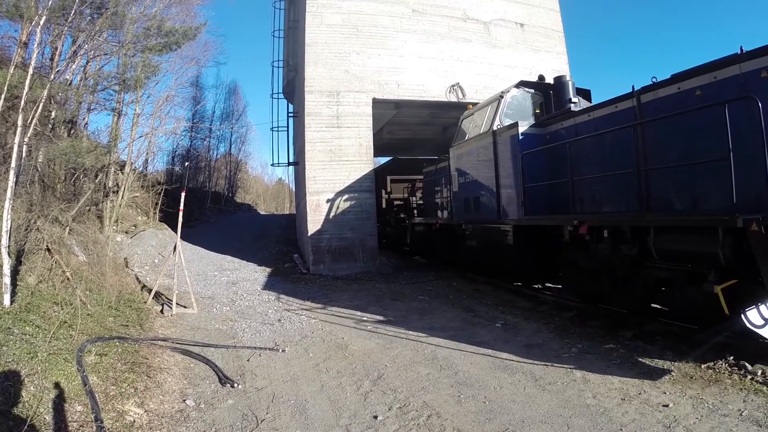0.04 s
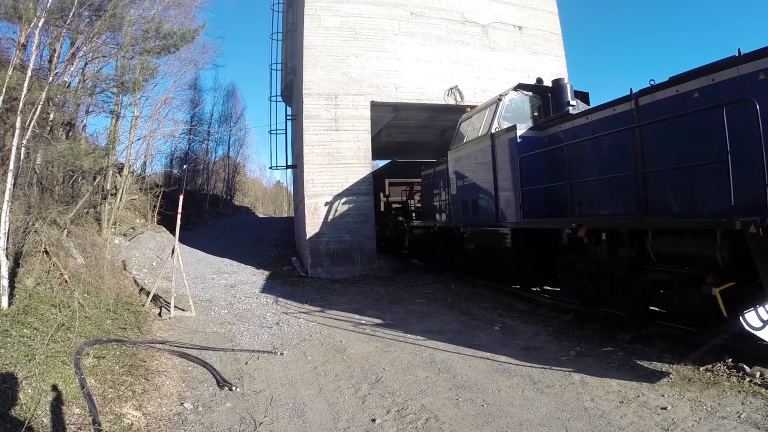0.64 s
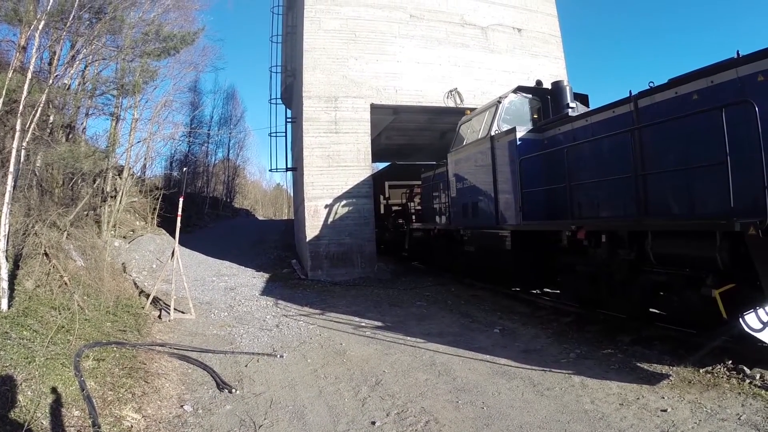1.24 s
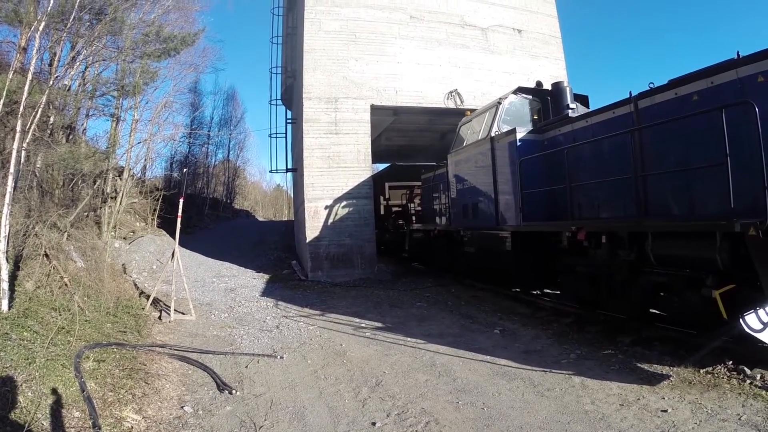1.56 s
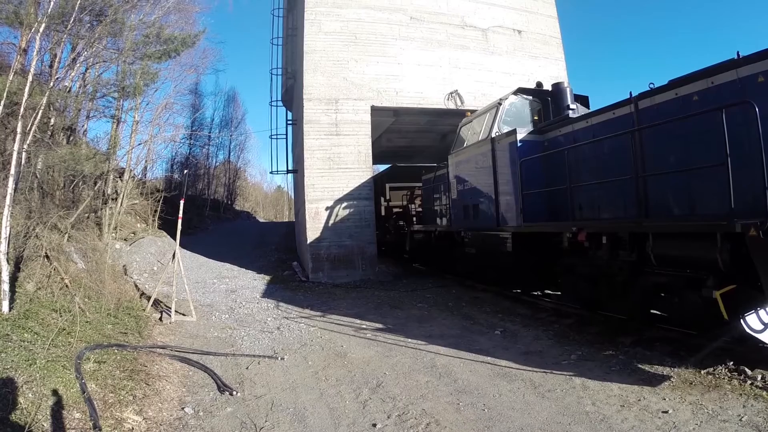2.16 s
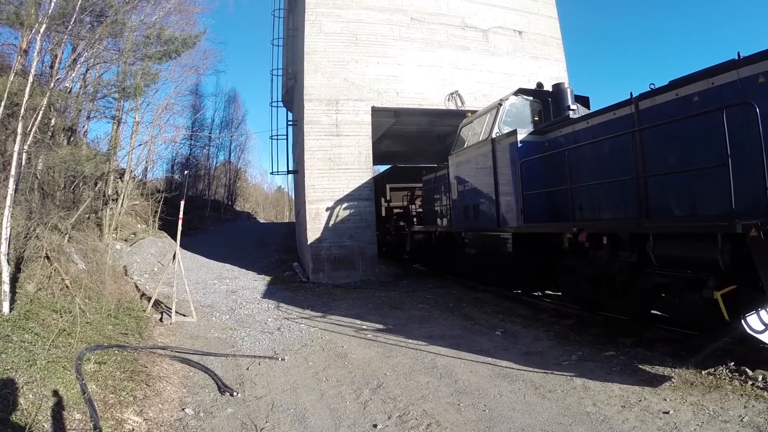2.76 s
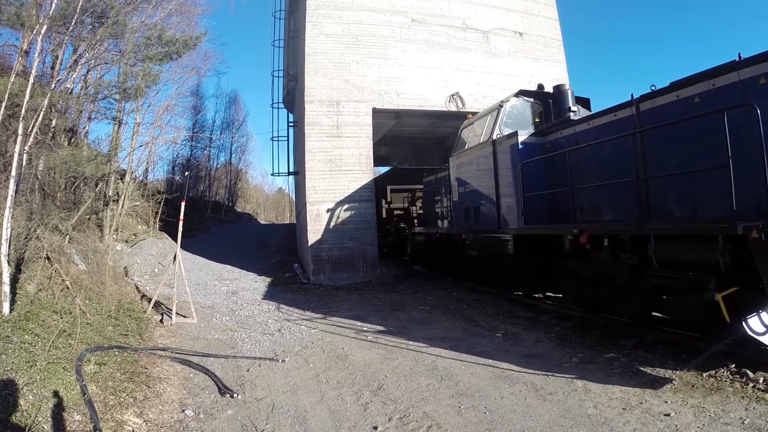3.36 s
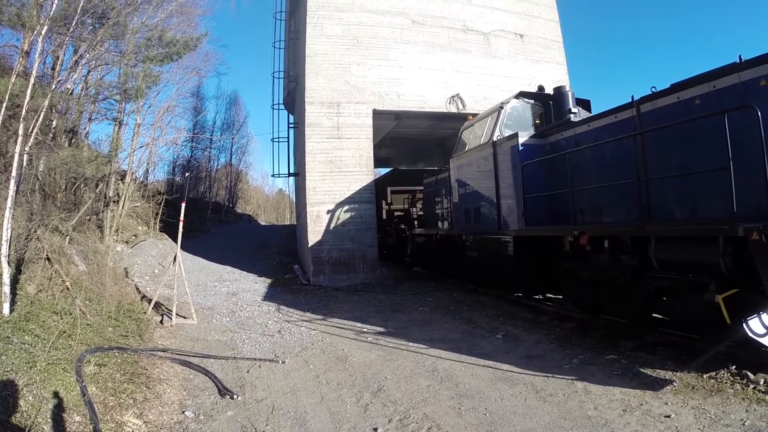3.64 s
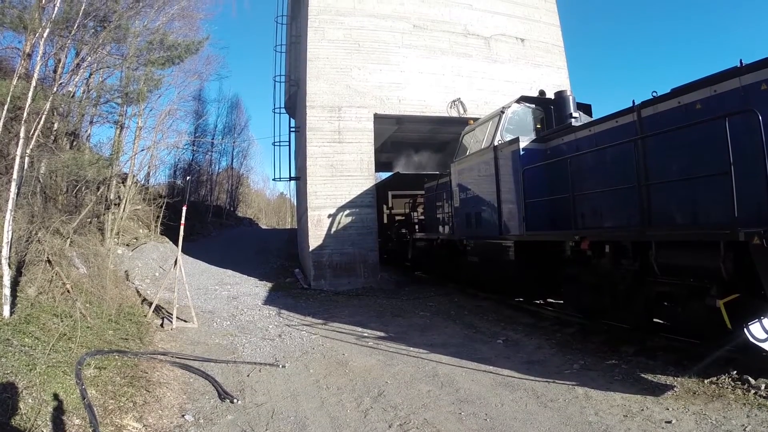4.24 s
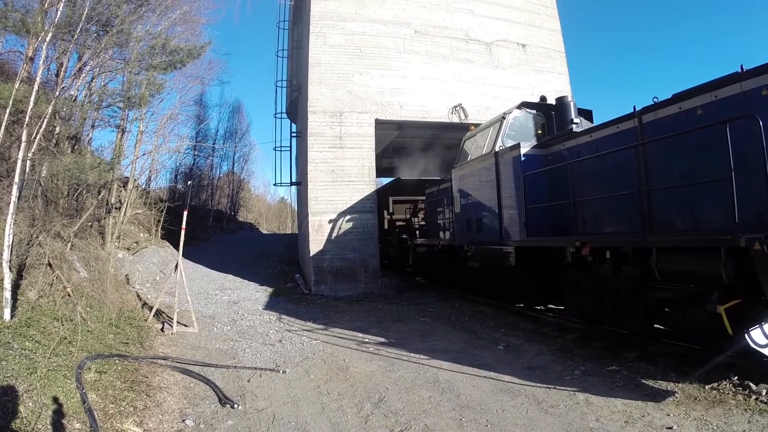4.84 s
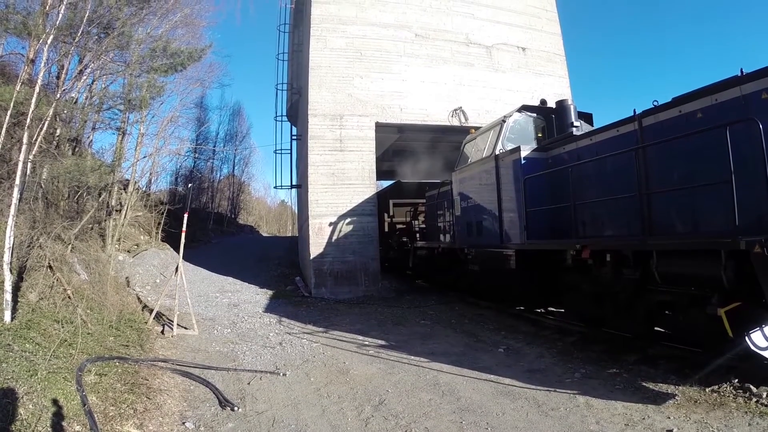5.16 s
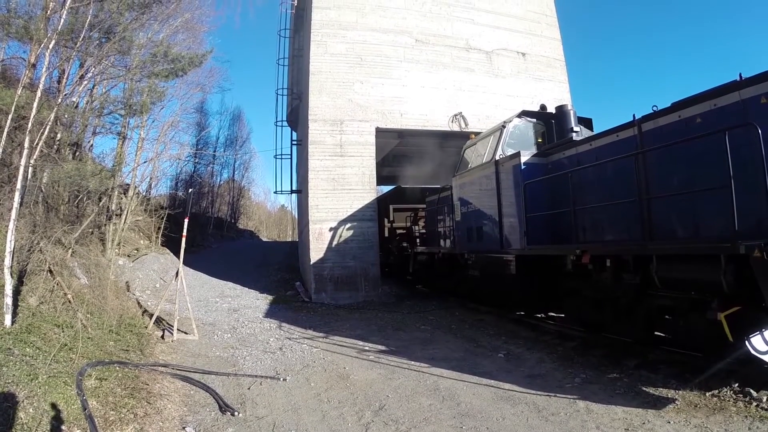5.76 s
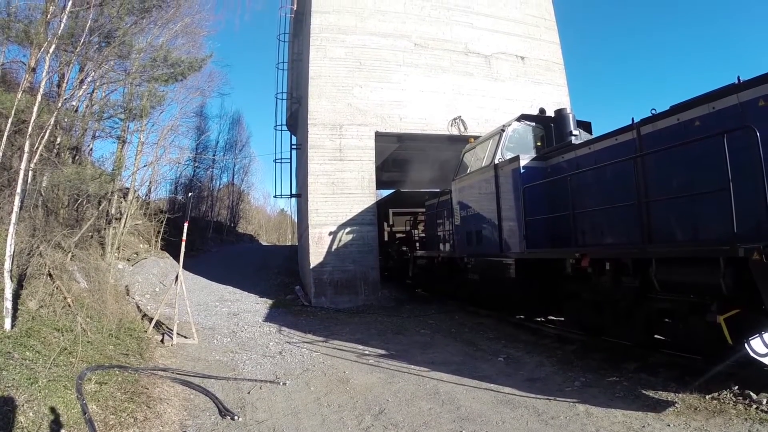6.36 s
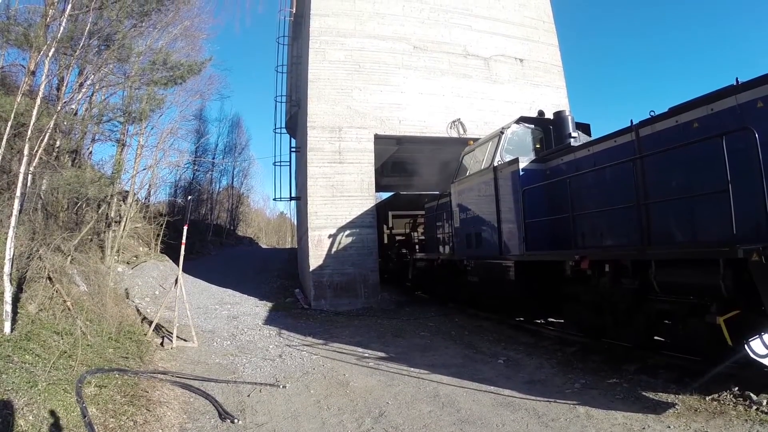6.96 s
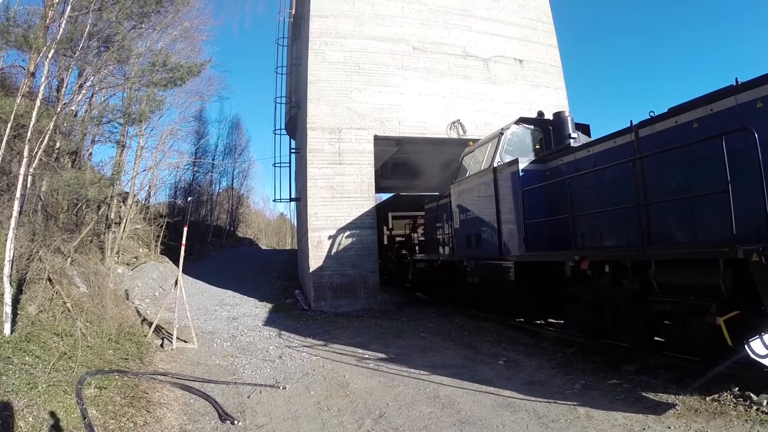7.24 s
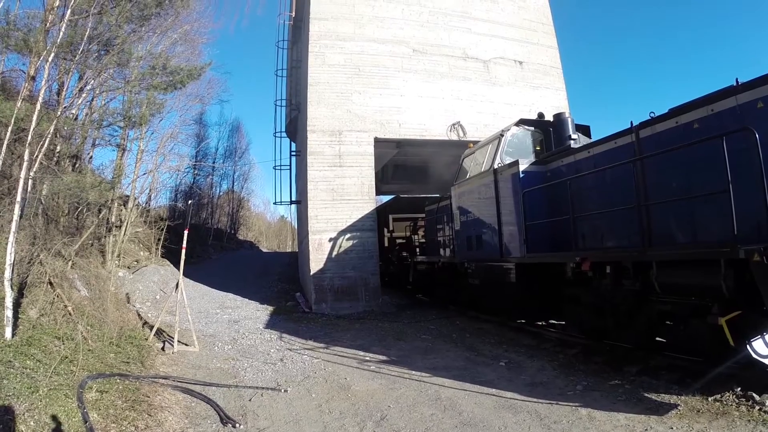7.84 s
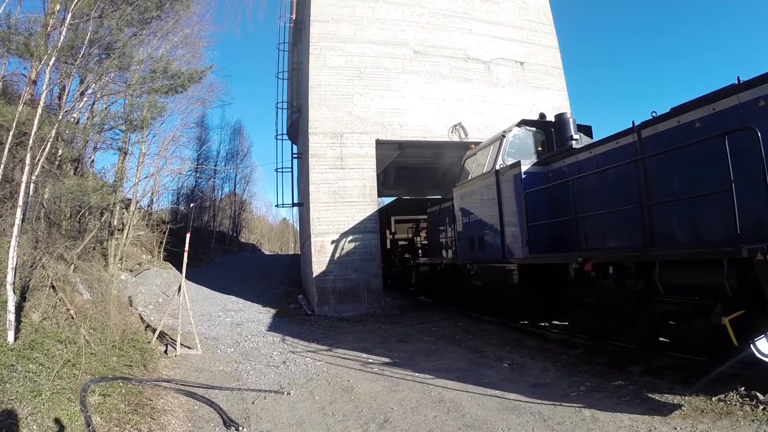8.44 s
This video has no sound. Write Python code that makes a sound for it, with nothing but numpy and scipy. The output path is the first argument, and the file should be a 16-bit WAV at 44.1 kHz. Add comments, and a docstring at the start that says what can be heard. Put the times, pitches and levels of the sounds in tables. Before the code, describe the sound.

A diesel locomotive idles, then crushed stone roars into a steel rail wagon, joined by a high hiss of air.

```python
"""A quarry in light wind, heard in mono from a small camera in its case.
A diesel locomotive idles beside a concrete loading tower, and gusts buffet the microphone.
Grit trickles from the tower's gate; near 3 s it opens and crushed stone roars into a rail wagon,
booming on the steel floor, then slowly eases off in surges. Just before 6 s something hisses,
probably vented compressed air: it whistles briefly, sags, and dies away after 8 s."""
import sys
import numpy as np
from scipy import signal
from scipy.fft import rfft, irfft, next_fast_len
from scipy.io import wavfile
from scipy.ndimage import uniform_filter1d

SR = 44100
rng = np.random.default_rng(int(sys.argv[2]) if len(sys.argv) > 2 else 0)


def file_out(sig):
    """Save sig as 16-bit WAV at sys.argv[1]."""
    # one column per channel
    cols = np.atleast_2d(sig).T
    # limit, then scale
    lim = np.clip(cols, -1, 1)
    pcm = np.round(lim * 32767).astype(np.int16)
    wavfile.write(sys.argv[1], SR, pcm)


N = 375291
PADDED = next_fast_len(N + SR // 10, True)
TIME, BINS = np.arange(N) / SR, np.fft.rfftfreq(PADDED, 1 / SR)
GATE_S = 2.943  # the tower's gate opens


def gain_of(db):
    """Decibels to amplitude."""
    return 10 ** (np.asarray(db) / 20)


def unit_rms(x):
    """Scales to rms 1."""
    return x / np.sqrt(np.mean(x ** 2) + 1e-20)


def curve(points, hz=BINS):
    """Joins (frequency, value) points by straight lines over log frequency."""
    f, value = np.transpose(points)
    return np.interp(np.log(hz + 1), np.log(f + 1), value)


def shaped(x, gain):
    """Filters x by a gain for each frequency."""
    return irfft(rfft(x, PADDED) * gain, PADDED)[:N]


def noise(gain):
    """Steady noise of rms 1 with the given spectral shape."""
    return unit_rms(shaped(rng.standard_normal(PADDED), gain))


def resonance(hz, width_hz):
    """Gain curve of one resonant peak."""
    return 1 / (1 + (2 * (BINS - hz) / width_hz) ** 2)


def wander(rate_hz):
    """Slow random drift of about rms 1, up to about the given rate."""
    steps, steps_per_s = 4096, 400
    hz = np.fft.rfftfreq(steps, 1 / steps_per_s)
    drift = irfft(rfft(rng.standard_normal(steps)) / (1 + (2 * hz / rate_hz - 1) ** 2))
    return np.interp(TIME * steps_per_s, np.arange(steps), unit_rms(drift))


def bursts(rows, rise_s):
    """Envelope of events that swell quickly and die away."""
    envelope = np.zeros(N)
    for start, db, t60 in rows:
        age = np.maximum(TIME - start, 0)
        envelope += gain_of(db - 60 * age / t60) * (1 - np.exp(-age / rise_s))
    return envelope


def engine_clatter(firing_hz, throb):
    """The locomotive beside the tower: its clatter throbs as the cylinders fire."""
    # clatter and fan at idle: f/Hz, relative density/dB
    spectrum = [(60, 7.5), (130, -1), (300, -3), (480, -6), (720, -5), (1000, -10), (1800, -7.5),
                (2700, -17), (3500, -20.5), (4800, -23), (5800, -49), (6800, -54), (9000, -31.5),
                (15000, -22.5)]
    firings = np.cumsum(firing_hz * (1 + .01 * wander(3))) / SR
    pulse = 1 + throb * np.cos(2 * np.pi * firings)
    return noise(gain_of(curve(spectrum))) * pulse * gain_of(0.27 * wander(27))


def engine_hum(drift, waver_db):
    """Firing orders, gears and fan sing steady tones that waver a little."""
    # tones at idle: f/Hz, level/dB
    tones = [(42.6, -56.5), (83, -65), (157.3, -67), (179, -67), (213, -64), (283.2, -67.5), (636.5, -67.5),
             (708.5, -71), (748.5, -69.5), (933, -72.5), (993, -83), (1096.5, -73), (1214.7, -79),
             (1706, -72), (1862.5, -74)]
    engine_time = np.cumsum(1 + drift * wander(3.3)) / SR
    hum = np.zeros(N)
    for hz, db in tones:
        amplitude = np.sqrt(2) * gain_of(db + waver_db * wander(6))
        hum += amplitude * np.sin(2 * np.pi * (hz * engine_time + rng.random()))
    return hum


def wind():
    """Light wind on the microphone: a lumpy low rumble with a few buffets."""
    # rumble: f/Hz, relative density/dB
    spectrum = [(5, -20), (16, 3), (32, 0), (52, -4), (72, -15), (130, -21), (400, -40), (2000, -70)]
    # gusts striking the microphone: t/s, level/dB, 60 dB decay/s
    buffets = [(.243, -34, 0.73), (2.085, -41, .2), (3.6, -48, 1.2), (4.93, -40, .5)]
    rumble = noise(gain_of(curve(spectrum))) * gain_of(-54 + wander(6.3))
    return rumble + noise(resonance(37.4, 55)) * bursts(buffets, rise_s=.008)


def microphone_hiss():
    """The microphone's own steady noise."""
    # noise floor: f/Hz, relative density/dB
    spectrum = [(100, 17.5), (7000, 2), (9500, -6.5), (11000, -7), (12200, -5), (14100, -6), (15200, -12)]
    return noise(gain_of(curve(spectrum)))


def clacks(per_s, spread_db, low_hz, high_hz, decay_cycles, pitches=32):
    """Stones knock on each other at random, each size ringing briefly at its own pitch."""
    strengths = gain_of(spread_db * np.minimum(rng.exponential(1, N), 4)) * rng.choice([-1, 1], N)
    hits = strengths * (rng.random(N) < per_s / SR)
    size = rng.integers(0, pitches, N)
    t, knocks = TIME[:1024], np.zeros(N)
    for k, hz in enumerate(np.linspace(low_hz, high_hz, pitches)):
        ring = np.sin(2 * np.pi * hz * t) * np.exp(-t * hz / decay_cycles)
        knocks += signal.oaconvolve(hits * (size == k), unit_rms(ring))[:N]
    return unit_rms(knocks)


def grit():
    """Fine chips fall from the gate ahead of the stream: a thin, bright patter."""
    # trickles of grit: t/s, level/dB, 60 dB decay/s
    trickles = [(2.362, -54, 0.24), (2.86, -64.5, 3.0), (2.965, -49, .7), (3.09, -42, .5)]
    chips = clacks(per_s=5500, spread_db=0, low_hz=4500, high_hz=12000, decay_cycles=1.2, pitches=8)
    patter = unit_rms(shaped(chips, BINS / np.hypot(BINS, 4000)))  # low cut
    return patter * bursts(trickles, rise_s=.005)


def stream():
    """The flow builds fast, then eases as the wagon fills. Gives level and weight, both in dB."""
    full_db, build_db, build_s, ease_db_per_s = -16.8, 25, 0.62, 3.3
    chips_db, heavy_after_s = -14.5, 0.56  # light chips land first, heavy stone follows
    age = np.maximum(TIME - GATE_S, 0)
    to_build = np.maximum(1 - age / build_s, 0)
    flow_db = full_db - build_db * to_build ** 1.22 - ease_db_per_s * np.maximum(age - build_s, 0)
    return flow_db, chips_db * np.maximum(1 - age / heavy_after_s, 0)


def pour(surge_t60_s=0.32, opening_s=0.12):
    """Stream and surges add in power, each with its own weight. Gives amplitude and weight in dB."""
    # loads sliding down on top of the stream: t/s, level/dB, rise/s, length/s, extra weight/dB
    surges = [(3.033, -28.3, 0.005, 0.006, -2.5), (3.263, -28.3, 0.004, 0.06, 0),
              (3.436, -24.2, 0.035, 0.065, 3), (3.58, -20, 0.027, 0.035, -4.5),
              (3.677, -24.2, 0.03, 0.16, 2.5), (4.024, -20.2, 0.017, 0.045, 4),
              (4.465, -20.5, 0.005, 0.033, 6.5), (4.565, -26.4, 0.045, 0.32, 2),
              (4.95, -21.8, 0.056, 0.095, 0.5), (5.33, -25.5, 0.07, 0.46, -2),
              (5.786, -25, 0.04, 0.24, 1.5), (6.098, -29.3, 0.02, 0.06, -1.5),
              (6.27, -27.7, 0.016, 0.02, -9), (6.386, -25, 0.013, 0.03, -5.5),
              (6.535, -27.1, 0.085, 0.36, -3), (6.931, -26, 0.05, 0.08, 1), (7.183, -24.1, 0.015, 0.08, -1),
              (7.31, -28.3, 0.05, 0.17, -0.5), (7.76, -32.5, 0.02, 0.15, -5), (7.96, -27.3, 0.1, 0.15, -3),
              (8.188, -29.2, 0.085, 0.125, 2.5), (8.425, -26.7, 0.045, 0.08, 0)]
    flow_db, weight_db = stream()
    power, extra_weight = gain_of(flow_db) ** 2, np.zeros(N)
    for start, db, rise, length, heavy_db in surges:
        release_db = -60 * np.maximum(TIME - start - length, 0) / surge_t60_s
        load = np.clip((TIME - start) / rise, 0, 1) * gain_of(db + release_db) ** 2
        power += load
        extra_weight += load * heavy_db
    gate = np.clip((TIME - GATE_S) / opening_s, 0, 1) ** 2
    return gate * np.sqrt(power), weight_db + extra_weight / power


def floor_boom(t, bare_db=-1.14, cushion_db_per_s=0.49):
    """Boom of the wagon's steel floor in dB: coarse rock swells it, the growing heap cushions it."""
    # coarse rock drumming on the floor: middle t/s, extra boom/dB, half length/s
    drumming = [(3.92, 5.5, 0.15), (4.55, 2.5, 0.08), (5.15, 6.5, 0.26), (6.05, 4.5, 0.2)]
    swells_db = sum(db * np.exp(-((t - middle) / half) ** 2) for middle, db, half in drumming)
    return bare_db - cushion_db_per_s * (t - GATE_S) + swells_db


def rush(weight_db, patch_db, flicker_db):
    """Countless small impacts merge into a rush that thickens in patches of time and pitch."""
    # heavier stone gives more bass and less top: f/Hz, response to weight/(dB per dB)
    weight_response = [(40, 1.3), (190, 0.72), (700, 0.78), (1400, 0.61), (3000, 0.072), (9000, -0.42)]
    # where the wagon floor sounds: f/Hz, response to boom/(dB per dB)
    boom_response = [(30, 0.47), (110, 2), (200, 0.0055), (400, 0.57), (700, 0.22), (1150, 0.054),
                     (1750, 0.15), (2600, 0.16)]
    hz, t, frames = signal.stft(rng.standard_normal(N), SR, nperseg=512, noverlap=384)
    patches = uniform_filter1d(rng.standard_normal(frames.shape), size=20, axis=0)
    patches = uniform_filter1d(patches, size=8, axis=1)
    flicker = uniform_filter1d(rng.standard_normal(len(t)), size=4)
    field_db = patch_db * unit_rms(patches) + flicker_db * unit_rms(flicker)
    field_db += curve(weight_response, hz)[:, None] * np.interp(t, TIME, weight_db)
    field_db += curve(boom_response, hz)[:, None] * floor_boom(t)
    return signal.istft(frames * gain_of(field_db), SR, nperseg=512, noverlap=384)[1][:N]


def bay_echoes(x, t60_s, wet_db, echoes_per_s=2000):
    """The concrete walls round the wagon answer with a dense tail of echoes."""
    t = TIME[:SR // 2]
    tail = rng.standard_normal(len(t)) * (rng.random(len(t)) < echoes_per_s / SR)
    tail *= gain_of(-60 * t / t60_s)
    echoes = signal.oaconvolve(x, tail / np.linalg.norm(tail))[:N]
    return unit_rms(x + gain_of(wet_db) * echoes)


def stone():
    """Crushed stone lands in the wagon: rush and knocks follow a flow that is never quite even."""
    # tone of the pour, thinner in the deep bass: f/Hz, gain/dB
    tone = [(30, -6), (85, -3.8), (103, -0.5), (180, 0.8), (400, 0.5), (1500, 0.5), (5000, 0.5),
            (15000, 0.5)]
    flow, weight_db = pour()
    roar = rush(weight_db, patch_db=0.66, flicker_db=0.22)
    knocks = clacks(per_s=1800, spread_db=3, low_hz=1830, high_hz=12600, decay_cycles=1.34)
    knocks = bay_echoes(knocks, t60_s=0.1, wet_db=1)
    knocks = shaped(knocks, BINS / np.hypot(BINS, 1200))  # small stones radiate little bass
    uneven = gain_of(0.4 * wander(19))
    return shaped(flow * uneven * (roar + gain_of(-9) * knocks), gain_of(curve(tone)))


def vented_air():
    """A jet of air hisses, whistles briefly on its outlet's edge, and sags as the pressure drops."""
    # hiss of the jet, with dips near 5 kHz from the camera's case: f/Hz, relative density/dB
    spectrum = [(2500, -35), (4600, -12), (5380, -16), (5600, -5), (6000, -2), (6550, 0.5), (7100, -6),
                (7700, -9.5), (8500, -18.5), (9050, -11), (10200, -15.5), (11100, -15.5), (12700, -25),
                (13250, -23), (14400, -30)]
    # whistle, a thin core in a breathy band: f/Hz, width/Hz, relative level/dB
    bands = [(6280, 100, 3), (6050, 650, -3)]
    open_s, rise_s, hold_s, sag_db_per_s = 5.82, 0.08, 1.09, 5
    peak_s, swell_db_per_s, fade_db_per_s = 6.24, 38, 21  # the whistle
    shut_s, shut_db_per_s = 8.02, 45
    age, past_peak = TIME - open_s, TIME - peak_s
    valve = np.clip(age / rise_s, 0, 1) * gain_of(-shut_db_per_s * np.maximum(TIME - shut_s, 0))
    hiss_db = -31 - sag_db_per_s * np.maximum(age - hold_s, 0)
    whistle_db = -26 + np.minimum(swell_db_per_s * past_peak, -fade_db_per_s * past_peak)
    hiss = noise(gain_of(curve(spectrum))) * gain_of(hiss_db + 0.5 * wander(10))
    whistle = noise(sum(gain_of(db) * resonance(hz, width) for hz, width, db in bands))
    return valve * (hiss + whistle * gain_of(whistle_db))


def scene():
    """At the microphone: stone, grit and clatter share one colour; hum, air and wind arrive direct."""
    # resonances colouring the sound from the loading bay: f/Hz, width/Hz, gain/dB
    peaks = [(205, 265, 6), (520, 170, 3), (668, 345, 4.5), (990, 160, 6.5), (1155, 222, 7),
             (1475, 200, 3.5), (1707, 308, 9), (2280, 470, 7.0), (2588, 330, 8.5), (2689, 42, 12.5),
             (3136, 630, 8.5), (3475, 230, 11), (3642, 106, 10), (4316, 570, 4), (4630, 440, 5.5),
             (4934, 580, 4.5), (5790, 590, 5), (6130, 480, 0.1), (6880, 810, -2.5), (7540, 320, -3),
             (7920, 610, -9), (9640, 1600, -16), (10450, 740, -15.5), (10900, 1080, -19),
             (12250, 570, -28.5), (13380, 1510, -30), (15030, 1220, -36.5)]
    colour = np.sqrt(sum((gain_of(db) * resonance(hz, width)) ** 2 for hz, width, db in peaks))
    loading_bay = stone() + grit() + gain_of(-55) * engine_clatter(firing_hz=42, throb=0.065)
    self_noise = gain_of(-62.5) * microphone_hiss()
    direct = engine_hum(drift=0.0017, waver_db=1.5) + vented_air() + wind()
    mono = shaped(loading_bay, colour) + direct + self_noise
    return np.array([mono, mono])


def record(dry):
    """The camera cuts off steeply just above 15 kHz."""
    low_pass = signal.firwin(511, 15270, window=("kaiser", 9), fs=SR)
    return signal.oaconvolve(dry, low_pass[None], "same")


dry = scene()
out = record(dry)
file_out(out)
```